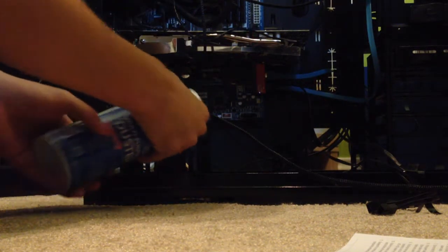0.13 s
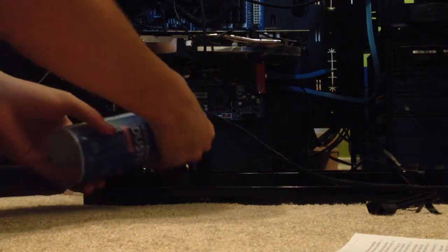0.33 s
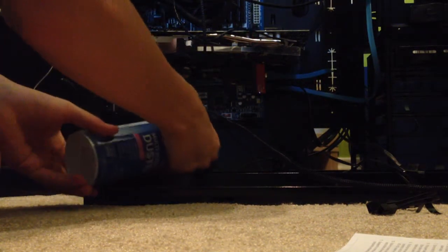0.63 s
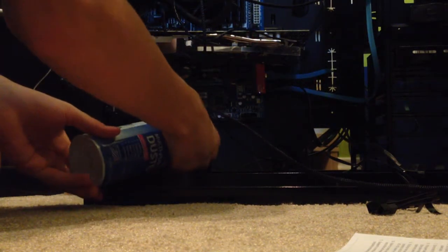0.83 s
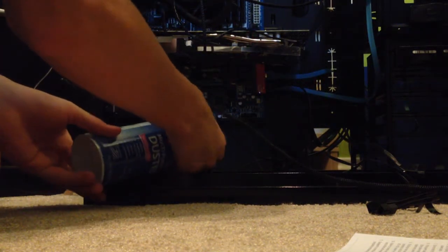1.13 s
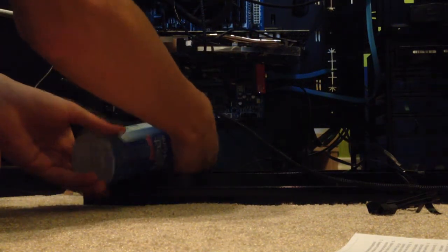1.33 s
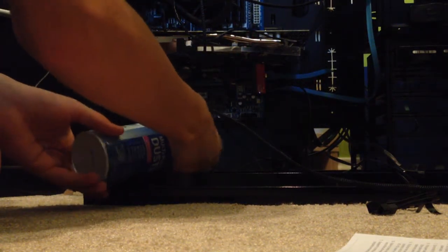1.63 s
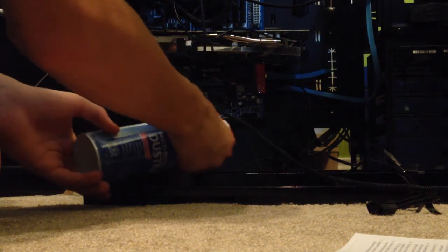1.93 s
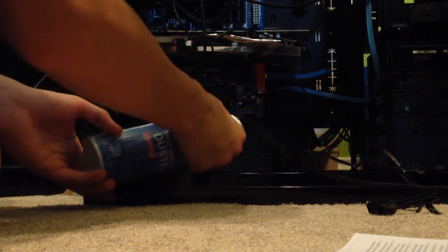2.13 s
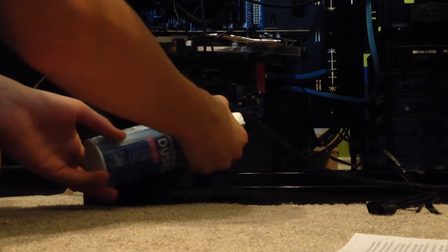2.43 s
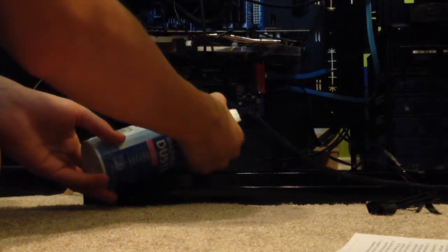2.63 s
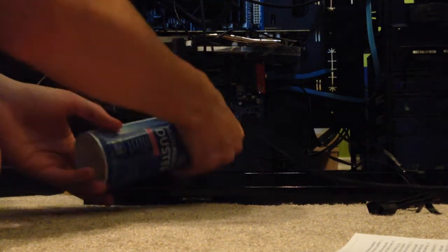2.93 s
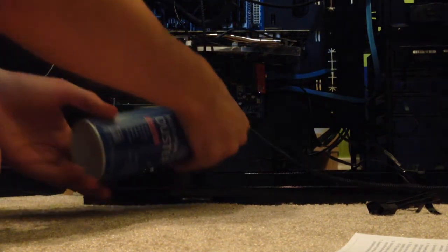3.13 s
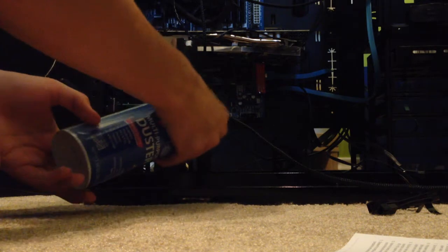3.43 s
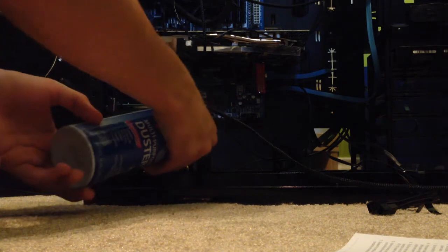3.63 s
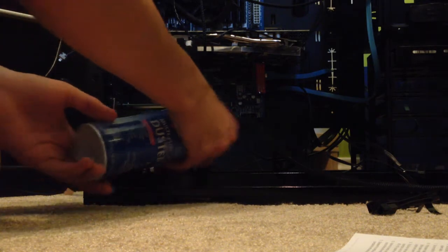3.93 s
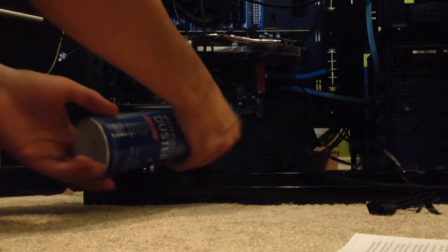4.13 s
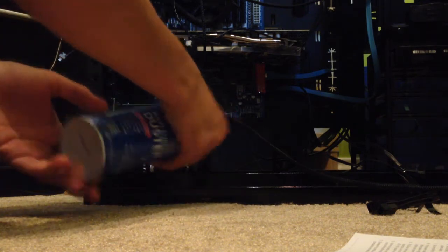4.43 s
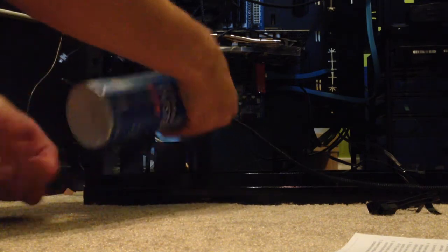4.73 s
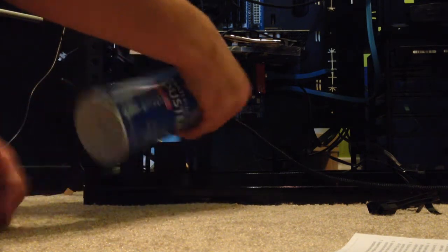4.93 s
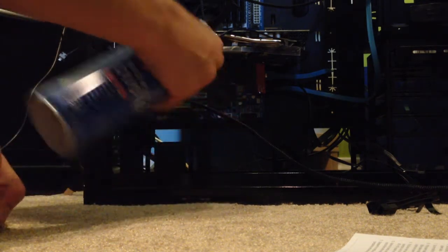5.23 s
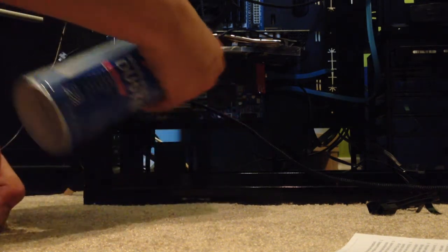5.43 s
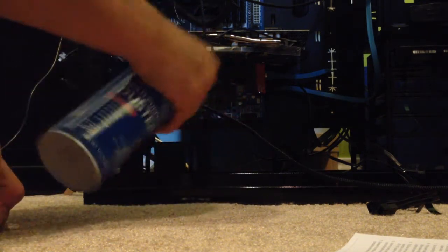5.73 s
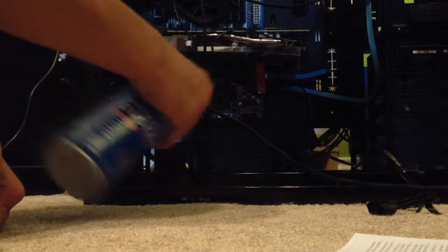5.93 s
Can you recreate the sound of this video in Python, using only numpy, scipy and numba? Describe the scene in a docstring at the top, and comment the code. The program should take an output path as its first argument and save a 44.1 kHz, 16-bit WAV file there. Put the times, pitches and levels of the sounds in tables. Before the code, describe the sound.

In a small, damped room, the tail of a hissing puff dies away and a can knocks lightly against an open computer case, rattling its panels. Eleven short puffs of compressed air follow, about three a second, each a bright hiss with shifting whistles and hollow rings. One longer blast ends the run, wavering and roaring softly as it crosses the parts inside. A single microphone picks it up over faint room tone.

```python
"""The tail of a hissing puff dies away in a small damped room. A can of compressed gas knocks against
an open computer case on a carpet, and eleven short puffs and one long blast are aimed inside.
The free jet hisses; where it meets edges, slots and hollows it whistles, rings and roars.
Each knock rattles loose sheet and rings the panels. A low hum swells once over the room tone.
One microphone feeds both channels."""
import sys
import numpy as np
from scipy import signal
from scipy.fft import rfft, irfft, next_fast_len
from scipy.io import wavfile
from numba import njit

SR = 44100
rng = np.random.default_rng(int(sys.argv[2]) if len(sys.argv) > 2 else 0)


def output_pcm(signal):
    """Save a mono or channel-first signal as 16-bit PCM at the path in sys.argv[1].

    Samples are clipped to [-1, 1] before scaling.
    """
    pcm = np.clip(np.atleast_2d(signal).T, -1, 1) * 32767
    wavfile.write(sys.argv[1], SR, np.round(pcm).astype(np.int16))


N = 267863
PRE_ROLL = round(.15 * SR)   # samples before time zero, where the first puff starts
TIME = (np.arange(N + PRE_ROLL) - PRE_ROLL) / SR


def from_db(db):
    """Decibels to gain."""
    return 10 ** (np.asarray(db) / 20)


def rms_one(x):
    """Scale to rms 1."""
    return x / np.sqrt(np.mean(x ** 2) + 1e-20)


def at_hz(points, hz, column=1):
    """Read a column of (Hz, value, ..) points on a log-frequency axis."""
    points = np.array(points)
    return np.interp(np.log(hz + 1), np.log(points[:, 0]), points[:, column])


def coloured(spectrum):
    """Noise with the given spectrum; rms 1."""
    size = next_fast_len(len(TIME))
    gain = from_db(at_hz(spectrum, np.fft.rfftfreq(size, 1 / SR)))
    return rms_one(irfft(rfft(rng.standard_normal(size)) * gain, size)[:len(TIME)])


def gusts(rate_hz, depth_db):
    """A smoothly wandering random multiplier; rms 1."""
    r = np.exp(-2 * np.pi * rate_hz / SR)
    slow = signal.lfilter([1], [1, -2 * r, r * r], rng.standard_normal(len(TIME) + SR))[SR:]
    return rms_one(from_db(depth_db * rms_one(slow)))


@njit
def resonate(x, turn, r):
    """Two-pole resonance whose centre (turn, radians per sample) may move."""
    y = np.zeros(len(x))
    for i in range(2, len(x)):
        y[i] = x[i] - x[i - 2] + 2 * r * np.cos(turn[i]) * y[i - 1] - r * r * y[i - 2]
    return y


def blown(hz, width_hz):
    """Turbulence through an air resonance, applied twice for steep flanks; rms 1."""
    turn = 2 * np.pi * hz / SR * np.ones(len(TIME))
    r = np.exp(-np.pi * width_hz / SR)
    return rms_one(resonate(resonate(rng.standard_normal(len(TIME)), turn, r), turn, r))


# Trigger pulls; "struck" parts are slot, splash, hollow, boom and buffet. Levels are before mix trims.
# (start [s], fully open [s after start], strongest [s after start], shut [s after start],
#  strongest jet [dB], swell up to it [dB], sag after it [dB], part-open jet against open [dB],
#  edge against jet [dB], struck parts' duck during the leak [dB], slot [dB], splash [dB], hollow [dB],
#  hollow pitch [Hz], its glide [Hz], boom [dB], buffet [dB], struck parts' drift over the pull [dB])
PULLS = [ (-.146, .02, 0.02936, 0.14658, -13, 0, 27.5, -10, 0, -40, -27, -25, -25, 1871, 0, -38, -38, -26),
         (0.57, .03, .104, .166, -29, 13, 3, -3, -2, -34, -42, -32, -23, 2110, -50, -33, -39, 8),
         (0.97, 0.07421, 0.19156, 0.21131, -28.5, 3.5, 4, -10, -5, -42, -32, -30.5, -15.5, 2170, -60, -36, -41, 1.5),
         (1.378, 0.0516, 0.1564, 0.20078, -27, 9, 10.5, -8, 0, -38, -30, -26, -18, 1900, 250, -31, -43, -1),
         (1.85, 0.058376, 0.1307, 0.18035, -28.5, 2, 3, -11, -5, -42, -30.5, -30.5, -15.5, 2190, -100, -34, -36, -4),
         (2.2, 0.05287, 0.16606, 0.18, -29.5, 1.5, 7, -2, -6.5, -26, -33, -33, -22, 2140, -50, -30, -38, 0.5),
         (2.565, 0.047956, 0.11655, 0.17493, -28, 7.5, 7, -7, -3, -30, -45, -34.5, -31, 1900, 200, -28.5, -29, 0),
         (2.896, 0.04686, 0.1165, 0.19389, -18.5, 13.5, 6, -11, -7.5, -34, -33, -35.5, -30, 2064, -50, -45, -48, -7.5),
         (3.235, 0.03564, 0.09027, 0.14967, -25, 3.5, 5.5, -9, 0, -24, -29.5, -31.5, -31.5, 2180, -100, -41.5, -48, -1),
         (3.545, 0.03512, 0.09742, 0.1629, -18.5, 9, 4, -11, -5, -30, -32, -37, -27, 2260, 100, -48.5, -51, -1.5),
         (3.835, .065, 0.13886, 0.17781, -19, 4.5, 4.5, -14, -4.5, -22, -32, -37, -46, 2150, -400, -46, -45.5, -1.5),
         (4.11, 0.02987, 0.19948, 0.21966, -26.5, 0, 8, -10, -7, -26, -37, -41.5, -35, 1996, 300, -45, -48, -2.5),
         (4.429, 0.048926, 0.801, 1.7, -28, 0, 0, -12, -7, -22, -39, -38, -44, 2061, -200, -44, -44, 1), ]
STRUCK = ("slot", "splash", "hollow", "boom", "buffet")


def trigger():
    """Valve envelopes in dB, plus the hollow's pitch; the struck parts wake last and die first."""
    keyframes = []
    for (start, rise, top, shut, peak, swell, sag, part_open, edge, leak,
         slot, splash, hollow, hz, glide, boom, buffet, drift) in PULLS:
        opened, ended = peak - swell, peak - sag
        stages = [   # (time [s], jet [dB], struck parts' duck [dB], edge offset [dB])
            (-.004, -110, -80, 0), (-.003, -73.5, -80, 0),
            (0, -53.5, 1.2 * leak, -2),   # the valve cracks
            (.18 * rise, -46, leak, -7),   # it leaks
            (.55 * rise, opened + part_open, .33 * leak, -2),
            (rise, opened, 0, 0), ((rise + top) / 2, peak - swell / 4, 0, 0), (top, peak, 0, 0),
            (shut, ended, 0, 0), (shut + .01, ended - 5.5, -17, 0),   # it shuts
            (shut + .03942, ended - 14.5, -26, 0), (shut + .04042, -110, -80, 0)]
        for s, jet, duck, edge_offset in stages:
            along = np.clip(s / shut, 0, 1) - .5
            keyframes.append((start + s, jet, edge + edge_offset, duck, drift * along,
                              hz + glide * along, slot, splash, hollow, boom, buffet))
    times, *columns = np.transpose(keyframes)
    names = ("jet", "edge", "duck", "drift", "hollow_hz", *STRUCK)
    return {name: np.interp(TIME, times, column) for name, column in zip(names, columns)}


# Level rides on the last two pulls: (time [s], jet change [dB], struck parts' change [dB])
HAND_RIDES = [(4.11, 0, 0), (4.14, 6.5, 2.5), (4.172, 9, -6.5), (4.22, 0, 0), (4.316, 0, 3), (4.44, 0, 0),
              (4.478, 3.5, -3.5), (4.586, 4, 2), (4.626, 9, 0), (4.702, 3.5, 3), (4.744, -7, 1.5),
              (4.802, -4.5, -0.5), (5.074, -1, 1), (5.202, -1.5, -4), (5.288, 0, -5), (5.474, 0, -9.5),
              (5.53, -1.5, -5), (5.61, -0.5, 2), (5.752, -.5, 2), (5.83, -3, 2), (5.912, -4, -5),
              (5.948, -16, -24), (5.988, -10, 3), (6.038, -1, 1), (6.07, 1, 5)]


def hand(envelope):
    """The can turns and the finger eases, shifting the balance. Gives each layer's level in dB."""
    times, *columns = np.transpose(HAND_RIDES)
    jet_ride, struck_ride = [np.interp(TIME, times, column, left=0, right=0) for column in columns]
    level = {part: envelope[part] + envelope["drift"] + struck_ride for part in STRUCK}
    level["jet"] = envelope["jet"] + jet_ride
    level["edge"] = level["jet"] + envelope["edge"] + .3 * struck_ride
    return level


# Accents for each part; those with a negative attack or release are as good as silent.
# (time [s], peak before ducks and trims [dB], attack [s per 10 dB], release [s per 10 dB])
FLARES = { "edge": [(1.489, -25.5, .035, .035), (2.24, -35, .03, .04), (2.362, -32.5, 0.0539, .03),
          (3.071, -21.5, 0.0646, 0.0312), (3.299, -25, .04, .04), (3.6, -24, .03, .05),
          (3.973, -23, .04, .03), (2.941, -33, .02, .05), (4.645, -24, .03, .07), (4.75, -35, .05, .12),
          (4.96, -34, .06, .1)], "slot": [(0.674, -26, .045, .045), (1.535, -23, .04, .025),
          (2.356, -18.5, .016, .012), (2.983, -25, .05, .03), (3.071, -25, .04, .015),
          (4.15, -32, .02, .06), (4.55, -30, .1, .08), (4.94, -34, .02, .06), (4.68, -24, .05, .06),
          (5.67, -24.5, .033, .035), (5.818, -27.5, .03, .03)], "splash": [(1.535, -22, .06, .04),
          (2.679, -22.5, .05, .045), (5.03, -33, .15, .1), (5.558, -18.5, .011, .045),
          (5.67, -18.5, .05, .06), (5.818, -21.5, .06, .028)], "hollow": [(0.732, -5, .035, .005),
          (1.044, -16, .02, .06), (1.175, -15, .03, .01), (2.266, -12, .02, .045), (2.356, -4, .022, .02),
          (3.299, -20, -0.0318, 0.0562), (3.905, -21.5, 0.053, 0.0095), (4.755, -19.5, .06, .06),
          (4.945, -20.5, 0.0008, .07), (5.558, -26, -0.0036, -0.177), (5.67, -28.5, 0.0491, -0.1562),
          (5.818, -23.5, 0.0368, .025)], "boom": [(2.679, -24, .06, .06), (4.22, -38, .03, .12),
          (4.802, -27.5, .04, .1), (5.074, -36, .15, .1), (5.558, -18, .013, .065), (5.39, -39, .12, .1),
          (5.68, -27, .08, .16)], "buffet": [(1.966, -32, .06, .08), (2.266, -28, .017, .05),
          (4.85, -27, .08, .06), (5.392, -37, .12, .08), (5.558, -33, .04, .12)], }


def flare(level, duck_db):
    """A part flares as the stream crosses it; flares and struck parts duck with the valve. Gives dB."""
    power = {part: from_db(db + duck_db * (part in STRUCK)) ** 2 for part, db in level.items()}
    for part, accents in FLARES.items():
        for s, peak_db, attack, release in accents:
            near = slice(PRE_ROLL + int((s - 5 * attack) * SR), PRE_ROLL + int((s + 5 * release) * SR))
            from_peak = TIME[near] - s
            shape_db = 10 * np.minimum(from_peak / attack, -from_peak / release)
            power[part][near] += from_db(peak_db + shape_db + duck_db[near]) ** 2
    return {part: 10 * np.log10(p) for part, p in power.items()}


# Bright, airy jet: (frequency [Hz], spectral level [dB])
HISS_SPECTRUM = [(100, -31), (1000, -17.5), (4300, -22.5), (7000, -12.5), (9400, -5), (11500, -0.5),
                 (13500, 0), (16000, -8)]


def jet_hiss():
    """The turbulent free jet hisses with a fast, shallow flutter."""
    return coloured(HISS_SPECTRUM) * gusts(36, .68)


def edge_whistle(over_jet_db):
    """The harder the stream cuts an edge, the more a whistle stands out of the breathy band."""
    purity = from_db(-7.5 + 1.2 * np.clip(over_jet_db, -15, 5))
    whistle = purity * blown(7150 * gusts(3, .3), width_hz=350) * gusts(8, 4)
    return blown(6907.2, width_hz=4600) + whistle


def slot_ring():
    """Air through a slot rings in the upper mids."""
    return blown(3104.5, width_hz=980) * gusts(24, 1.8)


# Midrange splatter: (frequency [Hz], spectral level [dB])
SPLASH_SPECTRUM = [(500, -35.5), (1050, -8), (1350, 1), (1750, 4.5), (2500, 1), (3300, -13), (3800, -23),
                   (5000, -33)]


def board_splash():
    """The stream breaks up on the boards."""
    return coloured(SPLASH_SPECTRUM) * gusts(12.6, .5)


def hollow_ring(hz):
    """A blown hollow sings a rough, wavering note."""
    return blown(hz * gusts(15, .12), width_hz=490) * gusts(40, 2.2)


def case_boom():
    """The air in the case resonates broadly in the low mids."""
    return blown(457.12, width_hz=696.9) * gusts(17, 1.57)


# Low roar: (frequency [Hz], spectral level [dB])
BUFFET_SPECTRUM = [(40, -62), (100, -24), (160, -7), (270, 1.5), (400, 0.5), (700, -18.5), (2000, -57)]


def buffeting():
    """The stream buffets the case with a gusty roar."""
    return coloured(BUFFET_SPECTRUM) * gusts(10, .73)


def spray():
    """Jet plus all it excites, as (spread, beamed); the struck parts flutter as the stream flaps."""
    envelope = trigger()
    level = flare(hand(envelope), envelope["duck"])
    gain = {part: from_db(db - .5) for part, db in level.items()}
    flapping = gusts(17, .9)
    hiss = gain["jet"] * jet_hiss()
    edge = gain["edge"] * edge_whistle(level["edge"] - level["jet"])
    deep = gain["slot"] * slot_ring() + from_db(3) * gain["splash"] * board_splash()
    # the hollow faces the open side and sounds mostly forward
    beamed = from_db(-6) * gain["hollow"] * hollow_ring(envelope["hollow_hz"])
    deep += gain["boom"] * case_boom() + gain["buffet"] * buffeting()
    # the case hides the treble of the parts deep inside it
    deep = signal.sosfilt(signal.butter(4, 3600, fs=SR, output="sos"), deep)
    return hiss + edge + flapping * deep, flapping * beamed


def wall_echo(x):
    """Add a reflection off the case wall; its path changes as the hand moves, flanging the hiss."""
    delay_s = .001328 * gusts(1.174, 1.715)
    samples = np.arange(len(x))
    return x + from_db(-12.5) * np.interp(samples - delay_s * SR, samples, x)


# Short, damped reverb: (frequency [Hz], decay t60 [s], level [dB])
REVERB_BANDS = [(149.6, 0.19, 1.5), (1000.4, 0.26147, 4.5), (2190, .26, -2), (4010, 0.31804, 1),
                (15000, 0.21937, 2)]


def room_reverb(x):
    """Dense echoes: octave bands of noise fade in quickly, each dying at its own rate."""
    age = np.arange(SR // 2) / SR
    tail, edges = 0, np.geomspace(60, 18000, 9)
    for low, high in zip(edges, edges[1:]):
        bandpass = signal.butter(2, [low, high], "band", fs=SR, output="sos")
        band = signal.sosfilt(bandpass, rng.standard_normal(len(age)))
        hz = np.sqrt(low * high)
        t60, db = at_hz(REVERB_BANDS, hz), at_hz(REVERB_BANDS, hz, column=2)
        tail = tail + band * from_db(db - 60 * age / t60)
    tail *= np.clip(age / .019936, 0, 1)
    return signal.fftconvolve(x, tail / np.sqrt(np.sum(tail ** 2)))[:len(x)]


# Background bed: (frequency [Hz], spectral level [dB])
BED_SPECTRUM = [(18, -79), (30, -48.5), (69, -30.5), (85, -9), (164, -10.5), (202, -4.5), (263, -11),
                (341, -7), (1110, -23.5), (2240, -26), (15500, -35.5)]


def room_tone():
    """Faint, steady room tone and microphone hiss."""
    return from_db(-60) * coloured(BED_SPECTRUM)


# Can against case: (time [s], level [dB], ring peak against that level [dB])
HITS = [(0.476, -24.5, -16), (0.494, -41, 9), (0.534, -27.5, 4), (0.803, -28.5, -2.5), (1.38, -35.5, 0)]
# Ringing panels: (frequency [Hz], level [dB], decay t60 [s])
PANEL_MODES = [(338, -16.5, .06), (491.34, 3, .07), (495.78, 1, 0.13), (578.8, 1.5, .06),
               (912.98, -1, 0.07054), (1240.3, -16.5, .05), (1816, -12.5, .03)]
# Loose sheet: (frequency [Hz], spectral level [dB])
RATTLE_SPECTRUM = [(88, -33.5), (150, 12), (966, -8.5), (1510, -1.5), (1940, -3), (2980, -9), (4140, -25.5),
                   (7410, -19), (15500, -31.5)]


def can_knocks():
    """Each knock is a crack, a dying rattle of loose sheet and a short scrape that rings the panels."""
    track, rattle = np.zeros(len(TIME)), coloured(RATTLE_SPECTRUM)
    age = np.arange(round(.6 * SR)) / SR
    for s, level_db, ring_db in HITS:
        start = PRE_ROLL + int(s * SR)
        span = slice(start, start + len(age))
        white = rng.standard_normal(len(age))
        scrape = white * from_db(-60 * age / .16873) + 1e-18
        ring = np.zeros(len(age))
        for hz, db, t60 in PANEL_MODES:
            r, turn = from_db(-60 / (t60 * SR)), 2 * np.pi * hz / SR
            ring += from_db(db) * signal.lfilter([0, np.sin(turn)], [1, -2 * r * np.cos(turn), r * r], scrape)
        ring *= from_db(ring_db) / np.max(np.abs(ring))
        crack = from_db(-11 - 60 * age / .012) * white
        shake = from_db(-7.5 - 60 * age / .18) * rattle[span]
        track[span] += from_db(level_db) * (crack + shake + ring)
    return signal.sosfilt(signal.butter(2, 160, "high", fs=SR, output="sos"), track + 1e-18)


# One brief swell of hum: (time [s], level [dB])
HUM_SWELL = [(2.13, -73), (2.18, -49.5), (2.3, -51.5), (2.42, -52.5), (2.5, -60)]


def low_hum():
    """A narrow low band of noise swells and fades."""
    times, db = np.transpose(HUM_SWELL)
    return from_db(np.interp(TIME, times, db, left=-120, right=-120)) * blown(148, width_hz=15)


def scene():
    """Spray and knocks in the room, over the hum and the room tone."""
    spread, beamed = spray()
    spread = wall_echo(spread) + can_knocks()
    reverb = from_db(-10.5) * room_reverb(spread + from_db(-8) * beamed)
    mix = spread + beamed + reverb + low_hum() + room_tone()
    return np.tile(mix[PRE_ROLL:], (2, 1))


# Colour of the microphone housing: (centre [Hz], width [Hz], gain [dB])
HOUSING_EQ = [(425.29, 87, -6.5), (1020, 900, 0), (3980, 800, 0.5), (9271, 1500, -2.5)]


def record(dry):
    """The microphone housing carves dips and loses the bass; the top is cut steeply."""
    for hz, width_hz, db in HOUSING_EQ:
        band = signal.lfilter(*signal.iirpeak(hz, hz / width_hz, SR), dry)
        dry = dry + (from_db(db) - 1) * band
    dry = signal.sosfilt(signal.butter(1, 170, "high", fs=SR, output="sos"), dry)
    return signal.sosfilt(signal.ellip(10, .5, 70, 15520, fs=SR, output="sos"), dry)


dry = scene()
out = record(dry)
output_pcm(out)
```